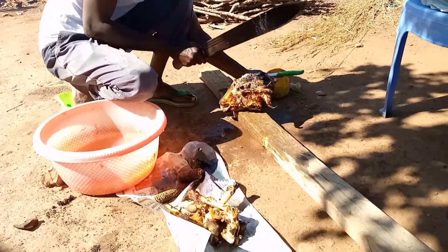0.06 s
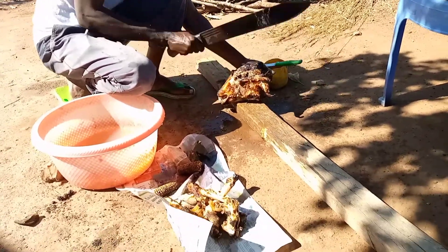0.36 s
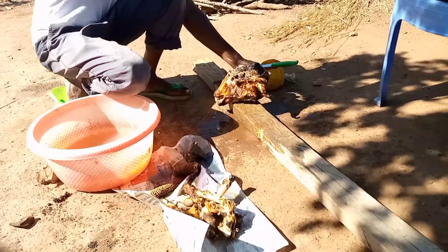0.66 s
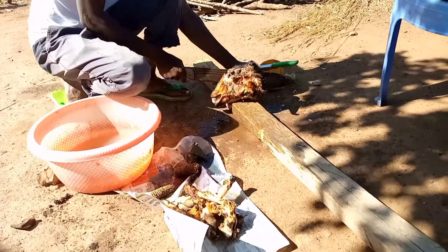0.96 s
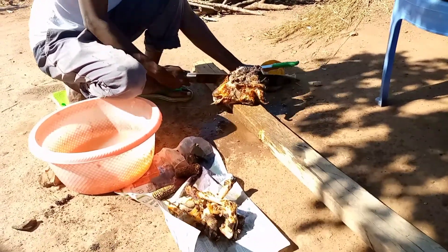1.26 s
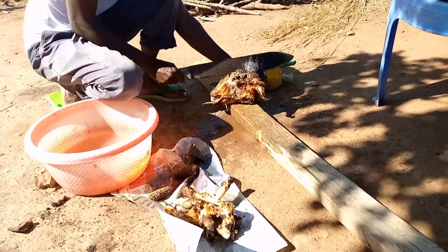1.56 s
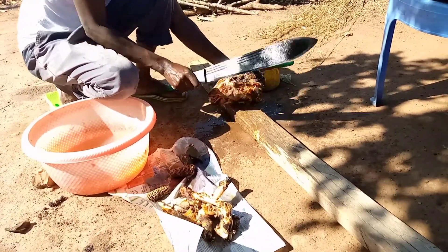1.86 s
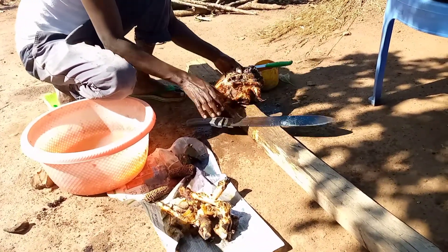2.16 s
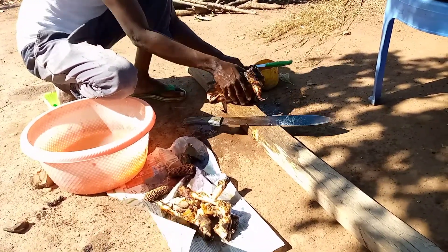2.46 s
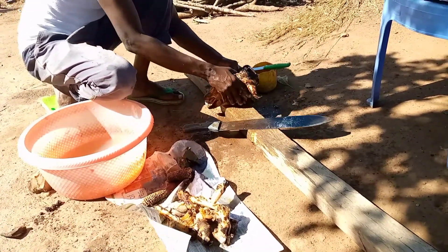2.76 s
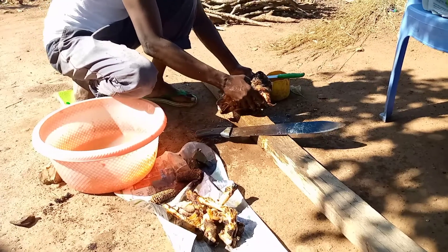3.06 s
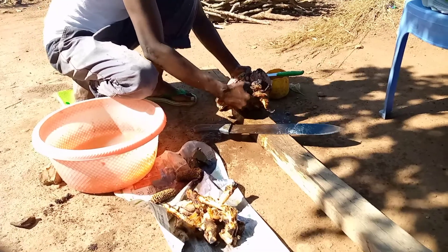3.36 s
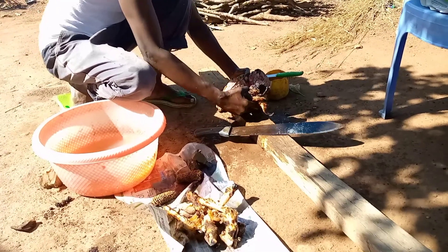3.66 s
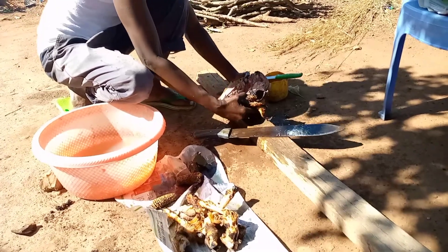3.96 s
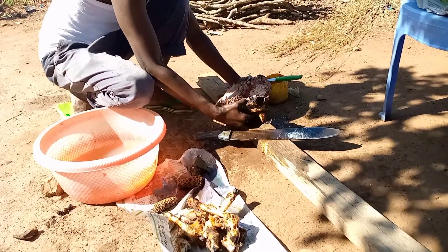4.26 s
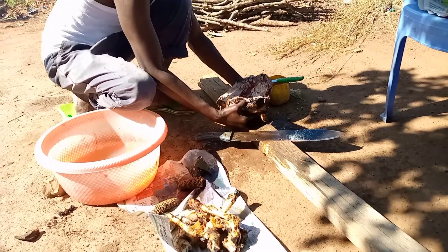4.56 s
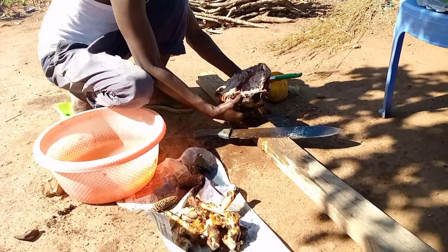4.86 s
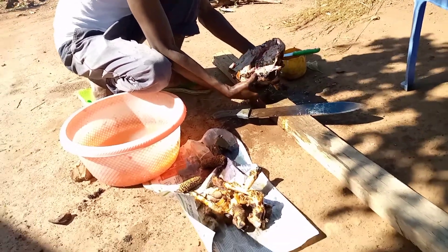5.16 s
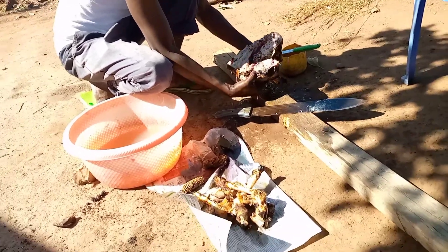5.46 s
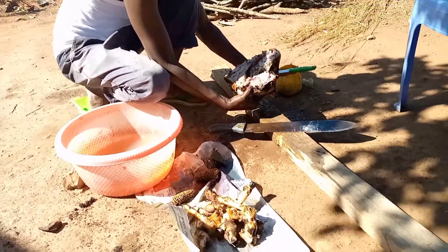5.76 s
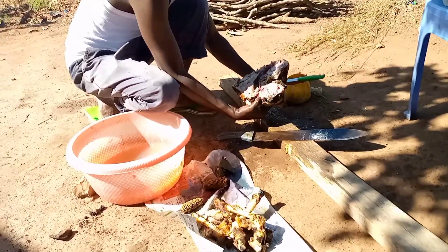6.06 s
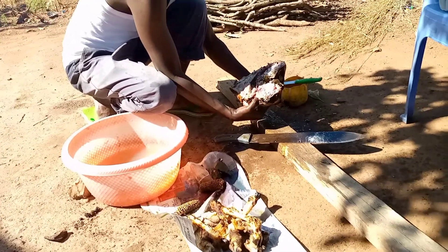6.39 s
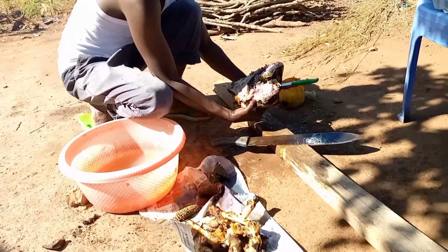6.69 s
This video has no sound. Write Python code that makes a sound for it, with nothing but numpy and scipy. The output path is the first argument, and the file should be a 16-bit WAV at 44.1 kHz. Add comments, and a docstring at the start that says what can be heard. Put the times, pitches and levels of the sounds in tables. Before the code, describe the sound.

A light metallic tap comes before one loud machete blow through a roasted animal head on a plank. Small cracks follow, then the blade rattles down on the wood. Much more quietly, crust crackles, bone snaps and a joint creaks as hands prise the skull open. Behind it lies a faint outdoor rumble and hush, with a few soft thumps on the hand-held microphone.

```python
"""A machete splits a roasted goat head on a wooden plank in an open yard: a light tap, then one hard chop.
Each impact excites the damped modes of bone, wood or steel, and each fracture adds a burst of noise.
The blade is laid down and clatters on the plank; hands pull the skull apart, so that crust rustles,
bone snaps, the joint creaks by stick-slip friction and wet gristle squeaks. Dull bumps reach the hand-held
microphone. Behind lie faint chirps, the yard's rumble and hush, and a thin, very high recorder hiss."""
import sys
import numpy as np
from scipy import signal
from scipy.fft import rfft, irfft, next_fast_len
from scipy.io import wavfile
from scipy.ndimage import uniform_filter1d, map_coordinates

SR = 44100
rng = np.random.default_rng(int(sys.argv[2]) if len(sys.argv) > 2 else 0)


def dump_mix(stems):
    """Bounce the given channels to the path in sys.argv[1] as a 16-bit WAV at rate SR."""
    frames = np.atleast_2d(stems).T  # one column per channel
    limited = np.clip(frames, -1, 1)  # hard clip at full scale
    pcm = np.round(limited * 32767).astype(np.int16)
    wavfile.write(sys.argv[1], SR, pcm)


N = 301026
T = np.arange(SR // 2) / SR  # the life of one hit, in seconds

# Modes of the skull's hollow. Each row: frequency in Hz, relative level in dB, T60 in seconds.
HOLLOW_MODES = [(887, -12.5, 0.061), (1438, 2, 0.022), (1923, 6.5, 0.016), (2317, 9, 0.0097),
                (2880, -12, 0.024), (3356, -9.5, 0.062), (4780, -13, 0.03), (5610, -11, 0.02)]
# The hands grip, pull or turn the head. Each row: start in seconds, length in seconds, level in dB.
HAND_STROKES = [(1.123, 0.29, -77), (1.528, 0.056, -75), (1.92, 0.044, -76.5), (2.554, 0.18, -76.5),
                (3.071, 0.21, -64), (3.456, 0.045, -62.5), (3.757, 0.13, -73), (4.053, 0.19, -75.5),
                (4.222, 0.18, -72), (4.512, 0.106, -67.5), (4.787, 0.31, -73.5), (5.153, 0.36, -71.5),
                (5.662, 0.12, -69), (5.893, 0.3, -71.5), (6.471, 0.36, -73.5)]


def amp(db):
    """Decibels to amplitude ratio."""
    return 10 ** (np.asarray(db) / 20)


def unit(x):
    """Normalisation to rms 1."""
    return x / np.sqrt(np.mean(x ** 2) + 1e-20)


def along(points, hz):
    """Interpolation of (Hz, value) points on a logarithmic frequency axis."""
    freqs, values = np.transpose(points)
    return np.interp(np.log(hz + 1), np.log(freqs), values)


def hump(hz, centre_hz, octaves):
    """A band-pass gain, symmetric in log frequency."""
    return (1 + (np.log2((hz + 1) / centre_hz) / octaves) ** 2 / 2) ** -2


def wobble(rate):
    """Smooth random modulation with rate knots a second."""
    knots = rng.standard_normal(int(N * rate / SR) + 4)
    return map_coordinates(knots, [np.arange(N) * rate / SR])


def stray(blur_hz, count):
    """Phase as the integral of frequency: count tones each tremble by blur_hz rms."""
    tremble = uniform_filter1d(rng.standard_normal((count, len(T))), size=64, axis=1)
    deviation_hz = blur_hz * unit(uniform_filter1d(tremble, size=48, axis=1))
    return 2 * np.pi * np.cumsum(deviation_hz, axis=1) / SR


def patchy(depth_db):
    """Noise modulated in time and frequency, so that its bands swell and sink independently."""
    spectra = signal.stft(rng.standard_normal(N), nperseg=1024)[2]
    field = uniform_filter1d(rng.standard_normal(spectra.shape), size=8, axis=0)
    field = uniform_filter1d(field, size=9, axis=1)
    return signal.istft(spectra * amp(depth_db * unit(field)), nperseg=1024)[1][:N]


def filtered(x, gain):
    """Zero-phase filtering by a gain that depends on frequency."""
    size = next_fast_len(len(x) + 8192)
    return irfft(rfft(x, size) * gain(np.fft.rfftfreq(size, 1 / SR)), size)[:len(x)]


def coloured(x, spectrum):
    """Spectral shaping by (Hz, dB) points, at rms 1."""
    return unit(filtered(x, lambda hz: amp(along(spectrum, hz))))


def add(track, start, sound):
    """Superposition of a sound on the track, from start in seconds."""
    part = track[round(start * SR):][:len(sound)]
    part += sound[:len(part)]


def fade(t60, rise):
    """A quick rise and an exponential decay of 60 dB in t60 seconds."""
    return (1 - np.exp(-T / rise)) * np.exp(-np.log(1000) * T / t60)


def ring(modes, rise, scatter_db, colour=np.ones_like, length=1, blur_hz=0):
    """Free vibration as a sum of damped modes; rubbing contact blurs their pitch."""
    hz, db, t60 = np.transpose(modes)
    gains = amp(db + scatter_db * rng.standard_normal(len(hz))) * colour(hz)
    gains = gains / np.sqrt(np.sum(gains ** 2) / 2)
    phases = rng.uniform(0, 2 * np.pi, (len(hz), 1)) + stray(blur_hz, count=len(hz))
    return sum(gain * np.sin(2 * np.pi * f * T + phase) * fade(life * length, rise)
               for gain, f, phase, life in zip(gains, hz, phases, t60))


def fracture(centre_hz, octaves, rise, t60, grit_db=3):
    """Brittle fracture: many tiny, uneven breaks merge into a decaying band of noise."""
    # The colour of a crack, with the microphone's thin ring near 15 kHz.
    # Each row: frequency in Hz, gain in dB.
    colour = [(30, -25), (80, -4), (200, 0), (3500, 0), (5200, -3), (6500, -8), (8000, -18), (11000, -13),
              (14000, -14), (15300, -2), (16100, -10)]
    envelope = fade(t60, rise)
    unevenness = unit(uniform_filter1d(rng.standard_normal(len(T)), size=40))
    grit = amp(grit_db * np.clip(unevenness, -2, 2)) * rng.standard_normal(len(T))
    breaks = filtered(grit, lambda hz: hump(hz, centre_hz, octaves) * amp(along(colour, hz)))
    return unit(breaks * envelope) * np.sqrt(np.mean(envelope ** 2))


def background():
    """Modulated noise: the yard's rumble and hush, plus a thin, very high recorder hiss."""
    # Each row of both spectra: frequency in Hz, relative spectral density in dB.
    rumble_spectrum = [(20, -18), (40, -9.5), (65, -4.5), (95, 0.5), (160, -5.5), (280, -6), (420, -15),
                       (600, -16), (1300, -53)]
    hush_and_hiss = [(200, -1), (450, 4), (800, 7.5), (1800, 5.5), (2800, 6), (3400, 2.5), (4200, -34),
                     (7000, -51), (13800, -31), (15200, -10.5), (16100, -16)]  # the peak at 15-16 kHz is the recorder's hiss
    # Each row: time in seconds, relative rumble level in dB, relative level of hush and hiss in dB.
    levels = [(0.0, -67.5, -64), (0.2, -67.5, -73.5), (0.55, -73, -69), (1.15, -69.5, -64),
              (1.7, -70.5, -67.0), (2.7, -67, -64.5), (4.0, -70.5, -67), (4.5, -73.5, -64), (5.0, -67, -65),
              (5.85, -65.5, -66.5), (6.3, -70.5, -69), (6.83, -70, -63)]
    times, *columns = np.transpose(levels)
    rumble_db, upper_db = [np.interp(np.arange(N) / SR, times, column) for column in columns]
    rumble = amp(2.5 * wobble(11)) * coloured(patchy(depth_db=3.5), rumble_spectrum)
    upper = amp(1.1 * wobble(7)) * coloured(patchy(depth_db=2.1), hush_and_hiss)
    return amp(rumble_db + 4) * rumble + amp(upper_db - 1.5) * upper


def cracks(splinters=3):
    """Impulse excitation: the blade's first light tap, then bone snapping, ring the skull's hollow."""
    # Short cracks and clicks; those near 0.3 s are the tap. Each row: start in seconds, level in dB,
    # centre in Hz, width in octaves, T60 in seconds.
    impulses = [(0.1059, -42, 3300, 1.2, 0.013), (0.2899, -45.5, 2200, 2, 0.092),
                (0.3271, -35, 1010, 1.46, 0.011), (1.0037, -36.5, 1680, 1.26, 0.031),
                (1.147, -47.5, 1180, 0.97, 0.031), (1.188, -49, 4660, 1.4, 0.019),
                (1.230, -48.5, 4100, 1.73, 0.016), (1.3093, -49, 2680, 1.9, 0.026),
                (1.405, -50.5, 2980, 0.94, 0.078), (1.528, -51.5, 810, 1.18, 0.13),
                (3.0699, -44.5, 800, 1.4, 0.03), (3.073, -36.5, 3330, 0.88, 0.017),
                (3.206, -44, 2020, 1.8, 0.03), (3.2194, -46.5, 4040, 1.2, 0.024),
                (3.3577, -48, 3320, 2.2, 0.031), (3.483, -38, 2317, 2.06, 0.036),
                (3.538, -50.5, 6380, 0.97, 0.046), (3.801, -44, 1336, 1.24, 0.053),
                (3.8655, -45.5, 2980, 1.64, 0.042), (4.044, -47, 1006, 1.02, 0.057),
                (4.1174, -45.5, 803, 1.2, 0.054), (4.227, -45, 1920, 1.33, 0.044),
                (4.619, -40.5, 3770, 0.91, 0.0209), (4.806, -46.5, 1830, 0.69, 0.081),
                (4.8424, -46, 3335, 3, 0.026), (5.2116, -48, 4610, 0.33, 0.026),
                (5.2752, -48, 5140, 1.3, 0.016), (5.287, -45, 4700, 0.63, 0.025),
                (5.3666, -50.5, 5000, 2.5, .019), (5.446, -43.5, 3990, 1.2, 0.036),
                (5.679, -40, 3040, 0.6, 0.024), (5.7569, -34.5, 2406, 1.3, 0.016)]
    out = np.zeros(N)
    for start, db, hz, octaves, t60 in impulses:
        # The narrower the band, the stronger its ping.
        ping = ring([(hz, 0, t60)], rise=0.000095, scatter_db=0, blur_hz=92.5) / octaves
        hollow = ring(HOLLOW_MODES, rise=0.0003, scatter_db=3, blur_hz=70,
                      colour=lambda f: hump(f, hz, octaves))
        crack = fracture(hz, octaves, rise=0.00073, t60=t60)
        add(out, start, amp(db) * (amp(-1) * crack + amp(-12) * ping + amp(-4.5) * hollow))
        for delay, pitch, weakness in rng.random((splinters, 3)):
            splinter = fracture(hz * 2 ** (pitch - 0.3), octaves / 2, rise=0.0002, t60=0.012)
            add(out, start + 0.026 * delay, amp(db - 10.5 - 10 * weakness) * splinter)
    return out


def blade():
    """Modal ringing: the struck steel blade sings thinly and buzzes against what it touches."""
    # Each row: frequency in Hz, relative level in dB, T60 in seconds.
    modes = [(3333, 8.5, 0.11), (3840, -4.5, 0.27), (4150, -4.5, 0.051), (4340, -8, .16),
             (4690, -4.5, 0.09), (5140, -10, 0.077), (6600, -14, 0.032), (9000, -18.5, 0.08),
             (9530, -15.5, 0.075), (10150, -12, 0.085), (11100, -13, 0.1)]
    # Each row: start in seconds, level in dB, rise in seconds, centre in Hz, width in octaves.
    strikes = [(0.2913, -39, 0.0036, 3270, 0.1), (2.110, -43.5, 0.001, 3480, 0.5),
               (2.168, -43, 0.00073, 5240, 0.63), (2.168, -69, .001, 9600, 0.2),
               (2.225, -49.5, 0.0009, 3900, 0.51), (2.380, -68, 0.0012, 4250, 0.16)]
    out = np.zeros(N)
    for start, db, rise, centre_hz, octaves in strikes:
        song = ring(modes, rise, scatter_db=1.5, colour=lambda hz: hump(hz, centre_hz, octaves), blur_hz=32)
        buzz = fracture(centre_hz, octaves / 2, rise, t60=0.11)
        add(out, start, amp(db) * (song + amp(-11) * buzz))
    return out


def bumps():
    """Structure-borne sound: soft bumps rock the microphone for a cycle or two, with a faint scuff."""
    # Each row: middle in seconds, envelope peak in dB, frequency in Hz, half length in seconds.
    jolts = [(0.325, -32, 173, 0.0019), (1.805, -28, 97, 0.0051), (1.86, -47, 127, 0.0068),
             (4.975, -22, 94.5, 0.0036), (5.1253, -35.5, 100, 0.0046)]
    out, t = np.zeros(N), T - T.mean()
    for middle, db, hz, half in jolts:
        pulse = -np.sin(2 * np.pi * hz * t) / np.cosh(np.pi / 2 * t / half)
        scuff = fracture(centre_hz=574, octaves=1.5, rise=0.002, t60=0.048)
        add(out, middle - T.mean(), amp(db) * pulse)
        add(out, middle - half, amp(db - 18.5) * scuff)
    return out


def fibres():
    """Tensile rupture: each wet fibre parts with a needle-sharp click over a fainter tick."""
    # Each row: start in seconds, level in dB.
    ruptures = [(.571, -59), (3.2236, -57.5), (3.4815, -50.5), (4.8442, -52), (5.1798, -55), (5.2759, -57),
                (5.552, -54.5), (5.7658, -42), (5.9023, -46.5), (6.406, -51)]
    out = np.zeros(N)
    for start, db in ruptures:
        click = fracture(centre_hz=15600, octaves=0.27, rise=0.0002, t60=0.015)
        tick = fracture(centre_hz=4140, octaves=1.0, rise=0.00038, t60=0.017)
        add(out, start, amp(db) * (click + amp(-3.5) * tick))
    return out


def chop(split_s=0.9105, split_db=-11):
    """Impact fracture: the edge crunches in, and the skull rings in its modes as it gives way."""
    # The blade's way through crust, skull and flesh, down to the soil. Each row: start in seconds,
    # level in dB, centre in Hz, width in octaves, rise in seconds, T60 in seconds.
    layers = [(.9066, -19, 2900, 1.5, 0.0044, 0.08), (.9195, -21, 1000, 0.68, 0.0011, 0.045),
              (.907, -34, 400, 1.5, 0.0018, 0.28), (.925, -34.5, 3000, 0.75, 0.0029, 0.27),
              (.915, -50, 130, 0.97, 0.004, 0.63)]
    # Each row: frequency in Hz, relative level in dB, T60 in seconds.
    skull_modes = [(1410, -4, 0.057), (1562, -13, 0.027), (1730, -6.5, 0.039), (1976, 0.5, 0.038),
                   (2505, 0.5, 0.027), (3286, -9, 0.05)]
    out = np.zeros(N)
    for start, db, hz, octaves, rise, t60 in layers:
        add(out, start, amp(db) * fracture(hz, octaves, rise, t60))
    add(out, split_s, amp(split_db) * ring(skull_modes, rise=0.0011, scatter_db=2, blur_hz=54.7))
    return out


def bite(start=0.9124, first_hz=3000, last_hz=1000, braking_s=0.005):
    """A gliding resonance: the rough tone of the cut falls as flesh brakes the edge."""
    hz = last_hz + (first_hz - last_hz) * np.exp(-T / braking_s)
    phase = 2 * np.pi * np.cumsum(hz) / SR + stray(blur_hz=140, count=1)[0]
    out = np.zeros(N)
    add(out, start, amp(-3) * fade(t60=0.024, rise=0.003) * np.sin(phase))
    return out


def plank(contacts=3, gap_s=0.0098, loss_db=9.5, node_depth=0.76):
    """Selective excitation: the place and hardness of each blow of steel on wood weight the modes."""
    # Plank with steel against it. Each row: frequency in Hz, relative level in dB, T60 in seconds.
    modes = [(208, -10.5, 0.17), (327, -19, 0.7), (515, -1, 0.24), (585, -3.5, 0.18), (776.4, -5.5, .19),
             (799.6, 0, 0.13), (994, -7.5, 0.081), (1060, -7.5, 0.091), (1101, -8, 0.12), (1335, -3, 0.07),
             (1367, 1.5, 0.088), (1423, -5.5, 0.11), (1754, 0, 0.085), (1820, -2, 0.074),
             (1980, -3.5, 0.065), (1980, -4, 0.077), (2515, -11, 0.08)]
    # Each row: start in seconds, level in dB, centre in Hz, width in octaves, mode struck at its node
    # in Hz, relative crack level in dB, ring length as a share of the free ring.
    knocks = [(0.9182, -17, 710, 1.6, 900, -15, 0.65), (2.1096, -27, 653, 1.9, 790, -8, 0.81),
              (2.1666, -21.5, 1340, 1.3, 1060, -8.5, 0.52), (2.1739, -29, 680, 0.38, 1060, -8, 0.77),
              (2.2238, -27, 1130, 1.06, 965, -8.5, 1), (2.2413, -23, 1320, 0.88, 1950, -15.5, 0.49),
              (2.290, -42.5, 1180, 2.7, 940, -11, 0.83), (2.322, -46, 550, 0.8, 1060, -22, 1),
              (2.3792, -26.5, 1446, 1.6, 980, -8.5, 1), (2.4629, -36.5, 1187, 0.78, 1860, -24, 0.69),
              (2.4998, -40, 896, 0.55, 1030, -43, 0.79), (2.692, -55, 642, 1, 1370, -1, 1)]
    out = np.zeros(N)
    for start, db, centre_hz, octaves, node_hz, crack_db, length in knocks:
        def excitation(hz):
            return hump(hz, centre_hz, octaves) * (1 - node_depth * hump(hz, node_hz, octaves=0.11))

        wood = ring(modes, rise=0.00076, scatter_db=-0.5, colour=excitation, length=length, blur_hz=11)
        clack = fracture(centre_hz, octaves=0.4, rise=0.00086, t60=0.031)
        thud = ring([(233, 0, 0.16)], rise=0.0021, scatter_db=0, blur_hz=60.1)  # plank rocks on soil
        add(out, start, amp(db) * (wood + amp(-6) * clack + amp(-22) * thud))
        for k in range(contacts):  # the steel chatters, weaker at each contact
            crack = fracture(centre_hz=1580, octaves=0.39, rise=0.0004, t60=0.065)
            delay = k * gap_s * rng.uniform(0.75, 1.25)
            add(out, start + delay, amp(db + crack_db - k * loss_db) * crack)
    return filtered(out, lambda hz: 1 / (1 + (hz / 6500) ** 6))  # wood cushions the edge


def rustle(grip_s=0.017, let_go_s=0.049, hold_db=-84):
    """Friction noise: moist crust and cloth rub under the hands in soft clumps of fine grains."""
    t = np.arange(N) / SR
    level = amp(hold_db)  # hands that only hold still rub faintly
    # Each row: frequency in Hz, relative spectral density in dB.
    crust_spectrum = [(88, -28), (150, -6.5), (330, -2.5), (560, -9), (871, -6), (1560, -16.5), (2400, -2),
                      (6400, -13.5), (7500, -34), (8600, -39), (15500, -29)]
    for start, length, db in HAND_STROKES:
        build = np.clip((t - start) / grip_s, 0, 1)
        release = np.exp(-np.maximum(t - start - length, 0) / let_go_s)
        level = level + amp(db) * build * release
    clumps = amp(2.6 * wobble(22) + 2.2 * wobble(220))
    return level * clumps * coloured(patchy(depth_db=2.2), crust_spectrum)


def crackle(pops_per_s=37, centre_hz=2416, spread_octaves=0.53, over_rub_db=11, spread_db=3):
    """Acoustic emission: moist flakes part with tiny pops in each stroke, louder under a firmer grip."""
    out = np.zeros(N)
    for start, length, db in HAND_STROKES:
        count = int(np.ceil(length * pops_per_s))
        delays = (np.arange(count) + rng.random(count)) / pops_per_s
        for delay, (force, pitch) in zip(delays, rng.standard_normal((count, 2))):
            hz = centre_hz * 2 ** (spread_octaves * np.clip(pitch, -2, 2))  # set by the flake's size
            pop = fracture(hz, octaves=0.43, rise=0.00033, t60=0.021)
            ping = np.sin(2 * np.pi * hz * T) * fade(t60=0.012, rise=0.00049)
            add(out, start + delay, amp(db + over_rub_db + spread_db * min(force, 1)) * (pop + ping))
    return out


def chirps(half_s=0.0094, glide_hz_per_s=2500):
    """Frequency modulation: thin, distant calls tremble and rise a little under a Gaussian envelope."""
    # Each row: middle in seconds, relative level in dB, frequency in Hz.
    calls = [(1.391, -63, 2480), (3.022, -68.5, 2870), (5.423, -67, 5890)]
    out, t = np.zeros(N), T - T.mean()
    envelope = np.exp(-(t / half_s) ** 2 / 2)
    for middle, db, hz in calls:
        phase = 2 * np.pi * (hz + glide_hz_per_s * t / 2) * t + stray(blur_hz=107, count=1)[0]
        add(out, middle - T.mean(), amp(db + 7) * np.sin(phase) * envelope)
    return out


def joint():
    """Stick-slip friction: as the joint is prised open, each slip of gristle rings the skull's hollow."""
    # Each row: start in seconds, level in dB.
    slips = [(2.898, -49.5), (3.698, -49), (4.557, -44), (4.952, -51), (4.983, -54), (5.006, -44),
             (5.05, -46.5), (5.1287, -41.5), (5.1477, -51), (5.169, -45.5), (5.9156, -34), (5.947, -37),
             (6.0374, -35), (6.0873, -40), (6.143, -39), (6.1866, -40), (6.2373, -43.5)]
    out = np.zeros(N)
    for start, db in slips:
        hollow = ring(HOLLOW_MODES, rise=0.0003, scatter_db=1.5, blur_hz=70)
        tick = fracture(centre_hz=2070, octaves=0.68, rise=0.00049, t60=0.03)
        add(out, start, amp(db) * (hollow + amp(-9) * tick))
    return out


def squeak():
    """Friction-driven vibration: wet gristle rasps for as long as it slides, then its modes die fast."""
    # Each row: frequency in Hz, relative level in dB, T60 in seconds.
    modes = [(608, -2.5, 0.033), (1460, -4.5, 0.01), (1974, 6, 0.025), (2680, -3, 0.056),
             (6070, -10, 0.022)]
    # Each row: start in seconds, length in seconds, level in dB, centre in Hz, width in octaves.
    slides = [(6.667, 0.0036, -56, 1726, 1.8), (6.682, 0.026, -49.5, 610, 0.44),
              (6.689, .014, -41, 2000, 1.5), (6.717, 0.012, -51, 1007, 1.8)]
    out = np.zeros(N)
    hz, mode_db, t60 = np.transpose(modes)
    attack = np.minimum(T / 0.001, 1)
    for start, length, db, centre_hz, octaves in slides:
        gains = amp(mode_db) * hump(hz, centre_hz, octaves)
        gains = np.sqrt(2) * gains / np.linalg.norm(gains)
        tones = np.sin(2 * np.pi * hz[:, None] * T + stray(blur_hz=85, count=len(hz)))
        release = np.exp(-np.log(1000) * np.maximum(T - length, 0) / t60[:, None])
        rasp = unit(amp(2.5 * wobble(700)[:len(T)]))
        add(out, start, amp(db) * rasp * (gains @ (tones * attack * release)))
    return out


def yard(x, build_s=0.0045):
    """Reverberation: ground and walls scatter a short tail whose decay depends on frequency."""
    # Each row: frequency in Hz, T60 in seconds.
    decay_times = [(150, 0.3), (600, 0.35), (2500, 0.22), (6000, 0.071), (12000, 0.11)]
    hz, t, spectra = signal.stft(rng.standard_normal(len(T)), SR, nperseg=256)
    decay = np.exp(-np.log(1000) * t / along(decay_times, hz)[:, None])
    tail = signal.istft(spectra * decay, SR, nperseg=256)[1][:len(T)]
    tail = tail * (1 - np.exp(-(T / build_s) ** 2))
    return signal.fftconvolve(x, tail / np.linalg.norm(tail))[:N]


def scene():
    """Superposition of all sources and the yard's reverberation, in one channel."""
    blow = chop() + bite()
    wood = plank()
    head = cracks() + fibres() + joint() + crackle() + squeak()
    steel = blade()
    echo = yard(amp(-19.5) * blow + amp(-19) * wood + amp(-14) * head + amp(-12.5) * steel)
    return (blow + wood + head + steel + echo + rustle() + bumps() + chirps() + background())[None]


def record(dry, low_hz=42, top_hz=16100):
    """Band limiting: the small microphone loses the deep bass and passes nothing above top_hz."""
    return filtered(dry[0], lambda hz: (hz < top_hz) * hz ** 4 / (hz ** 4 + low_hz ** 4))[None]


dry = scene()
out = record(dry)
dump_mix(out)
```